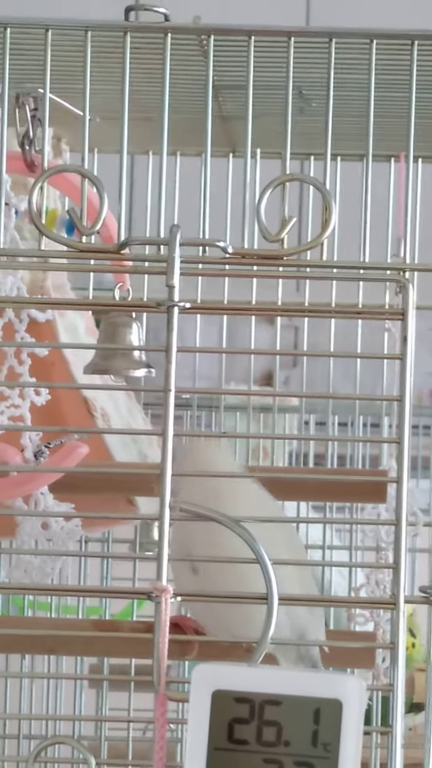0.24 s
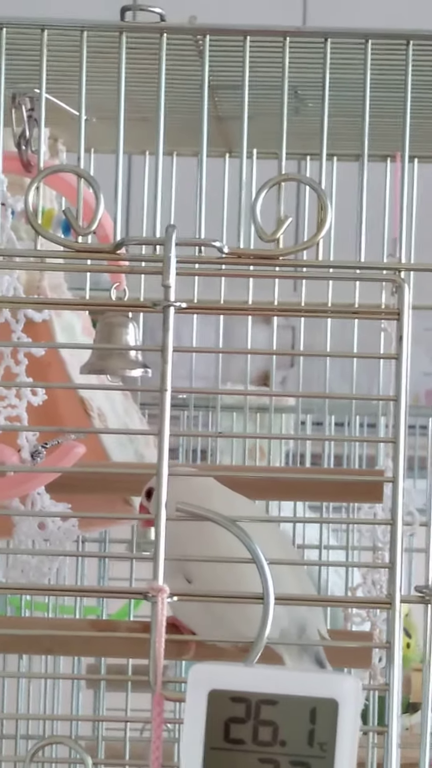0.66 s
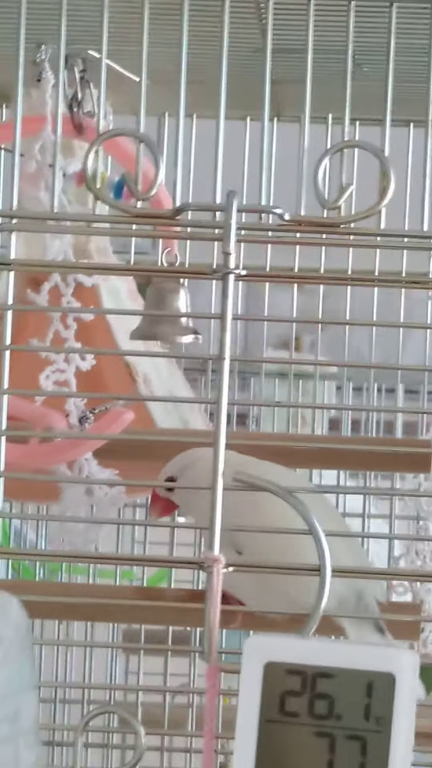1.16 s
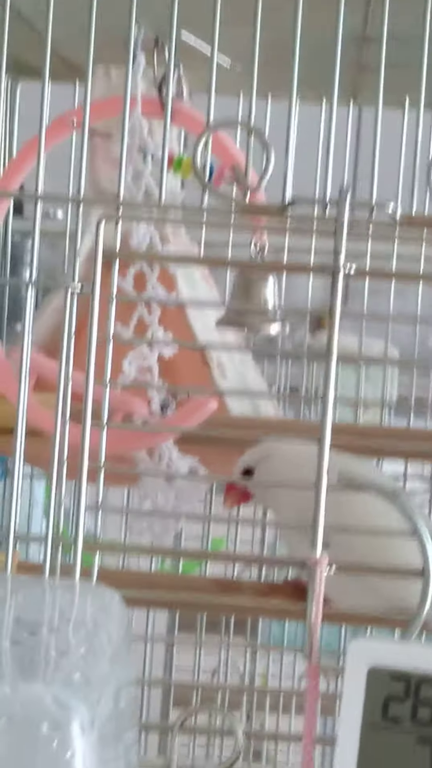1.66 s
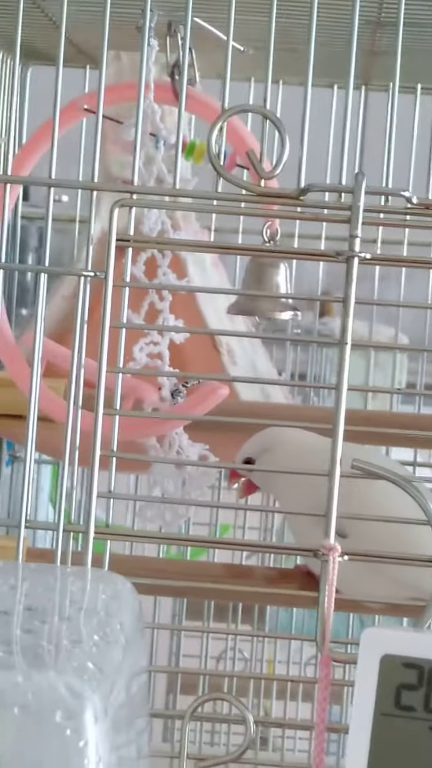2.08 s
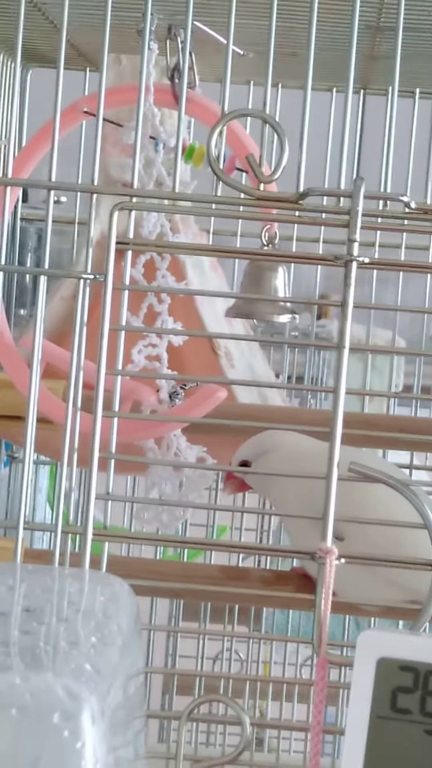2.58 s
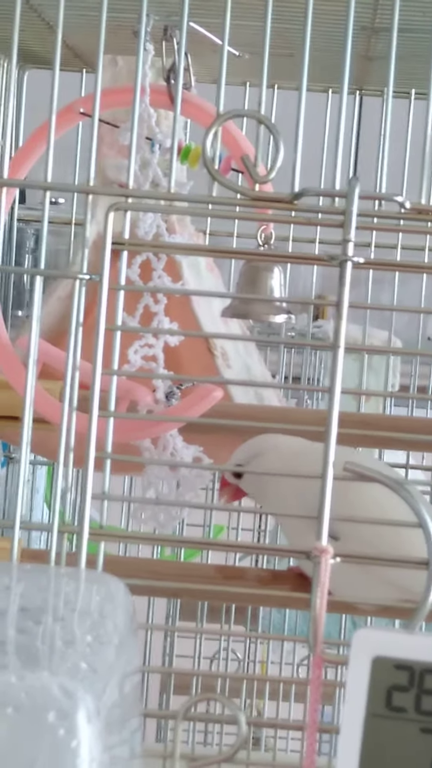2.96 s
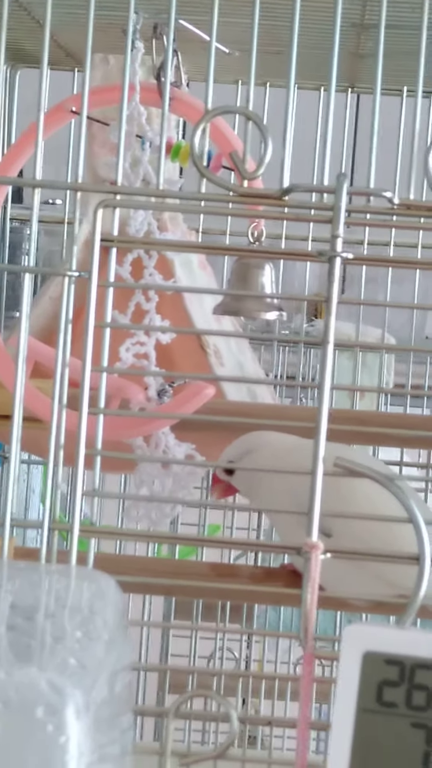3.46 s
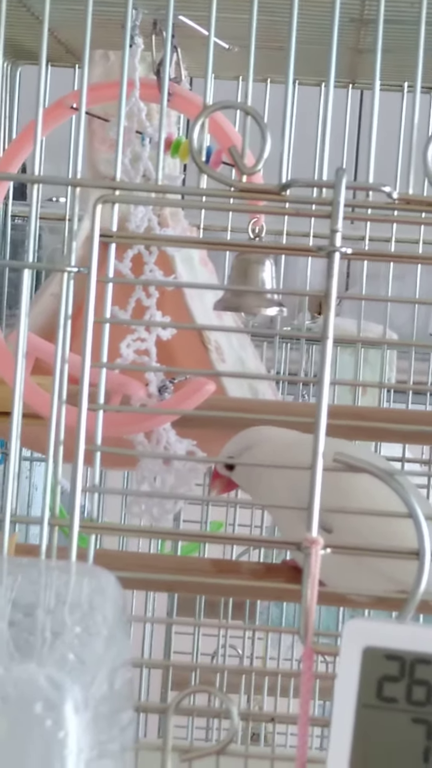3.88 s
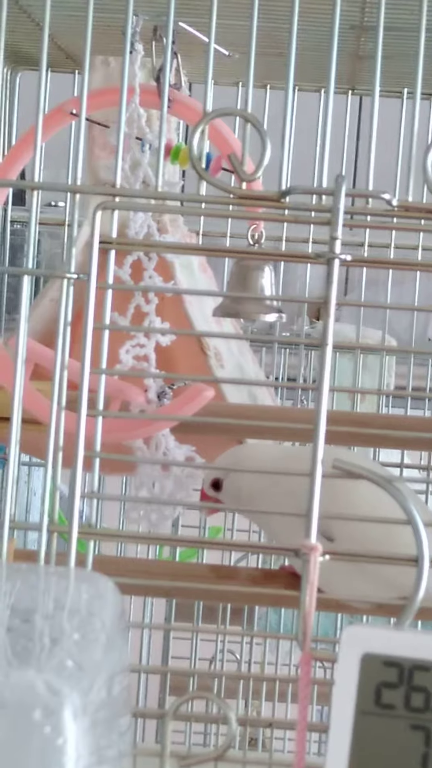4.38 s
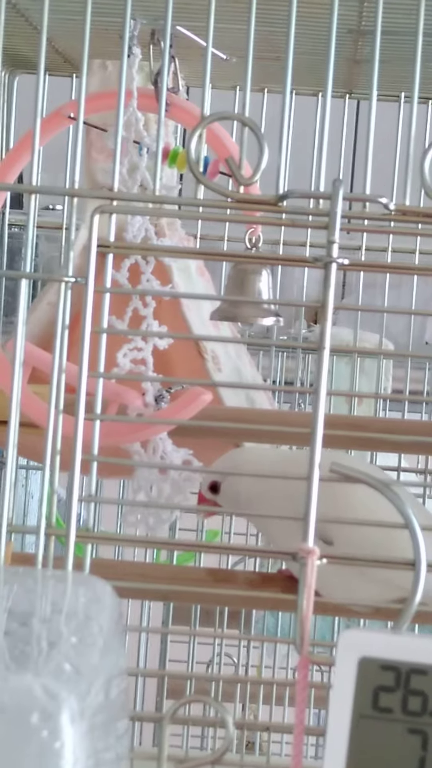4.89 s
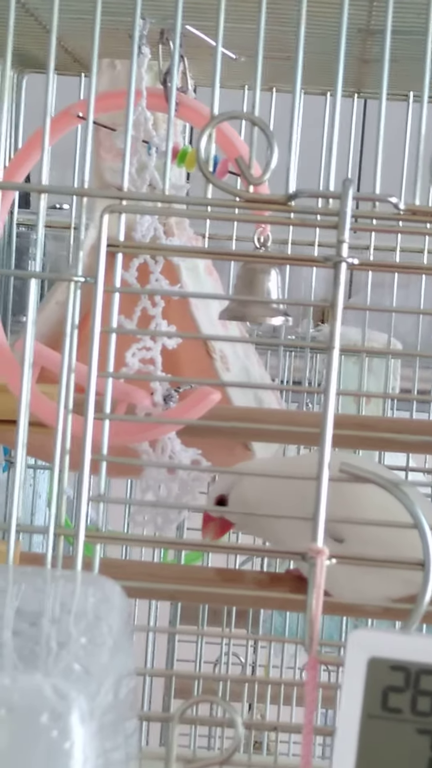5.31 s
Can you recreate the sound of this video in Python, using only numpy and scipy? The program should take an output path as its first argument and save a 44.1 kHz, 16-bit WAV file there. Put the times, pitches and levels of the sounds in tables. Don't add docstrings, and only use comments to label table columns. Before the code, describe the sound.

Indoors, a pet finch sings chips, a buzzy trill and sliding whistles on the right, while a gripping hand thumps and scrapes dully on the left.

```python
import sys
import numpy as np
from scipy import signal
from scipy.fft import rfft, irfft
from scipy.io import wavfile
from scipy.ndimage import uniform_filter1d

SR = 44100
rng = np.random.default_rng(int(sys.argv[2]) if len(sys.argv) > 2 else 0)


def inscribe(sig):
    pcm = np.round(np.clip(np.atleast_2d(sig).T, -1, 1) * 32767)
    wavfile.write(sys.argv[1], SR, pcm.astype(np.int16))


def makeup_ratio(level_db):
    decades = np.asarray(level_db, float) / 20
    return 10 ** decades


N = 244314
LEAD = 2048


def finch():
    song = np.zeros(N + LEAD)
    chips(song)
    trill(song)
    motifs(song)
    falling_whistles(song)
    far_bird(song)
    return makeup_ratio(1.5) * song


def syllable(song, shape, onset, db, pitch, overtones_db, warble=(0, 0, 0, 0), wobble=.004):
    s, share, level_db = np.transpose(shape)
    t = np.arange(s[0], s[-1], 1 / SR)
    chance = rng.standard_normal(15000)
    flutter = uniform_filter1d(chance, size=60)[:len(t)] * np.sqrt(60)
    drift = 0.13 * uniform_filter1d(chance, size=400)[:len(t)] * np.sqrt(400)
    start, rate, swing, swing_db = warble
    turns = np.cumsum((t > start) * rate * (1 + drift)) / SR
    dip = np.cos(2 * np.pi * turns) * np.minimum(turns, 1)
    glide = uniform_filter1d(np.interp(t, s, share), size=40, mode="nearest")
    shrinking_swing = swing * dip * (1 - 0.26 * t / s[-1])
    hz = pitch * glide * (1 + wobble * flutter + shrinking_swing)
    phase = 2 * np.pi * np.cumsum(hz) / SR
    tone = sum(makeup_ratio(g) * np.sin((k + 1) * phase) for k, g in enumerate(overtones_db))
    breath = makeup_ratio(db + np.interp(t, s, level_db) - swing_db * dip)
    place = int((onset + s[0]) * SR) + LEAD + np.arange(len(t))
    inside = place < len(song)
    song[place[inside]] += (breath * tone)[inside]


# (time [s], share of pitch [1], level [dB])
CHIP_SHAPE = [(-.002, 0.69, -19.5), (.0005, 0.82, -0.5), (.003, 0.95, -3.5), (.006, 0.97, -7.5),
              (.010, 1, 0), (0.012, 0.8, -57)]
RISE_SHAPE = [(-.001, 0.76, -35), (0, 0.83, -2), (.002, .97, -2.5), (.005, 1.02, -3), (.008, 0.996, -21)]
CHIP_OVERTONES = [-17.5, 0.5, -22.5, -21]
SOFT_CHIP_OVERTONES = [-11, -3.5, -32]
# (time [s], peak level [dB], second partial [Hz])
EARLIER_CHIP = [
    (-.015, -30.5, 2450),
]
LOUD_CHIPS = [(.4165, -30, 2527), (0.6272, -34.5, 2484), (.875, -33.5, 2350), (1.079, -29.5, 2567),
              (1.281, -34.5, 2414), (1.369, -33, 2452), (1.4513, -32, 2340), (1.532, -32.5, 2239),
              (1.613, -30.5, 2501), (1.697, -32, 2406), (1.778, -35.5, 2130)]
SOFT_CHIPS = [
    (0.2269, -44.5, 1743),
    (0.5398, -42.5, 1801),
    (0.7888, -42.5, 1806),
    (1.1796, -43, 1788),
]


def chips(song):
    for s, db, second_hz in EARLIER_CHIP + LOUD_CHIPS:
        syllable(song, CHIP_SHAPE, s, db, second_hz / 2, CHIP_OVERTONES)
    for s, db, second_hz in SOFT_CHIPS:
        syllable(song, RISE_SHAPE, s, db, second_hz / 2, SOFT_CHIP_OVERTONES)


# (time [s], sweep widths from the pitch [1], level [dB])
TRILL_SHAPE = [(-.008, -1.455, -65), (-.003, -0.82, -7), (.001, -0.17, -4.5), (.003, 0.2, 0),
               (.006, .9, -10.5), (0.01, 0.78, -45)]
# (time [s], share of pitch [1])
TRILL_SWEEP = [(1.87, 0.1), (1.93, 0.19), (2.15, 0.093), (2.3, 0.067), (2.6, 0.069)]
# (time [s], first partial level [dB], pitch [Hz], brightness [dB per partial])
TRILL_NOTES = [(1.8689, -30.5, 1469, -8), (1.8985, -27, 1600, -2), (1.933, -28, 1697, 0.9),
               (1.9638, -31, 1682, 0), (2.0, -31.5, 1652, 0.5), (2.034, -29.5, 1627, 0.35),
               (2.0677, -29.5, 1565, -1.4), (2.105, -31, 1533, 0.35), (2.142, -29.5, 1573, 0.75),
               (2.1796, -35.5, 1486, 1.5), (2.2162, -32, 1500, 0.9), (2.2527, -34.5, 1485, 0.7),
               (2.2903, -34.5, 1477, -0.1), (2.3301, -32.5, 1492, -0.2), (2.3667, -33, 1466, -0.4),
               (2.4022, -31.5, 1517, -1.5), (2.442, -30, 1495, -1.2), (2.4842, -32, 1441, -0.4),
               (2.5225, -32.5, 1449, -1.1), (2.5755, -38, 1333, -14)]
# (frequency [Hz], gain [dB])
THROAT = [(1500, -1), (2950, -1.1), (3350, 7), (4600, -7.5), (5900, 0.2), (6700, -12), (7500, -10.5),
          (9500, -32)]
# (time [s], share of pitch [1], level [dB])
DEEP_PIP_SHAPE = [(-.004, 0.805, -33), (.001, 0.924, -1), (.006, 0.988, -7), (.012, 1.02, 2),
                  (.018, 1.074, -27.5)]
# (time [s], peak level [dB], pitch [Hz])
DEEP_PIPS = [
    (1.8275, -44.5, 1135),
    (2.6493, -56, 1005),
    (2.699, -39, 1111),
]


def trill(song):
    throat_hz, throat_db = np.transpose(THROAT)
    k = np.arange(6)
    for s, db, hz, bright_db in TRILL_NOTES:
        sweep = np.interp(s, *np.transpose(TRILL_SWEEP))
        shape = [(after, 1 + sweep * step, level_db) for after, step, level_db in TRILL_SHAPE]
        resonance_db = np.interp(np.log(hz * (k + 1)), np.log(throat_hz), throat_db)
        syllable(song, shape, s, db, hz, bright_db * k + resonance_db, wobble=0.013)
    for s, db, pitch in DEEP_PIPS:
        syllable(song, DEEP_PIP_SHAPE, s, db, pitch, [0, -14])


# (time [s], share of pitch [1], level [dB])
TICK_SHAPE = [(-.0006, 0.75, -85), (0, 0.97, 0), (.0015, 0.98, 1), (.006, 1.0, -11), (.011, 0.5, -59)]
SQUEAK_SHAPE = [(-.002, 0.937, -62), (.001, 1.0, -2.5), (.007, 1.0, -27), (.011, 1.083, -7.5),
                (.014, 1.22, -8.5), (.017, 2.13, -28)]
HUM_SHAPE = [(-.004, .99, -39), (.006, .995, 7), (.03, 1.005, -15), (.05, 1.0, -3), (.06, 0.958, -1)]
LOW_PIP_OVERTONES = [-0.5, -17.5]
HUM_OVERTONES = [-2.5, -13.5]
# (time [s], tick level [dB], tick [Hz], squeak [Hz], low pip [Hz])
MOTIFS = [
    (2.787, -32.5, 6320, 2740, 1920),
    (3.2217, -36.5, 6170, 2765, 1926),
    (3.6736, -35, 6020, 2653, 1966),
    (4.143, -33.5, 6020, 2690, 1907),
    (4.591, -32.5, 6030, 2820, 1830),
    (5.0627, -31.5, 6005, 2890, 2020),
    (5.5308, -30, 5900, 2870, 1950),
]


def motifs(song):
    for s, db, tick_hz, squeak_hz, low_hz in MOTIFS:
        syllable(song, TICK_SHAPE, s, db, tick_hz, [0])
        syllable(song, SQUEAK_SHAPE, s + 0.0113, -41, squeak_hz, [0])
        syllable(song, RISE_SHAPE, s + 0.0215, -38, low_hz, LOW_PIP_OVERTONES)
        syllable(song, HUM_SHAPE, s + 0.095, -56.5, 880, HUM_OVERTONES)


# (time [s], pitch [Hz], level [dB])
HOOK = [(-.009, 6660, -42), (-.004, 6364, 0.5), (.001, 6020, 0.5), (.004, 7205, 1), (.009, 4868, 2.5),
        (.012, 4253, -11.5), (.016, 5010, -1.5), (.0205, 3784, -4)]


def fall_shape():
    end_s, release_s = 0.207, 0.043
    rest_hz, span_hz = 1213, 2858
    t = np.linspace(HOOK[-1][0], end_s + release_s, num=120)[1:]
    hz = rest_hz + span_hz * np.exp(-(t / 0.082) ** 1.35)
    fade_db = -33 * (1 - np.exp(-t / 0.087))
    crack_db = -17 * np.exp(-((t - 0.0764) / 0.0069) ** 2)
    release_db = -60 * np.maximum(t - end_s, 0) / release_s
    return np.vstack([HOOK, np.transpose([t, hz, fade_db + crack_db + release_db])])


FALL_OVERTONES = [-2.5, -36.5]
# (start [s], rate [Hz], pitch swing [share], level swing [dB])
WARBLE = (0.01593, 150, 0.039, 7.5)
# (time [s], peak level [dB], pitch factor [1], length factor [1])
FALLS = [
    (2.9575, -25, 1.0, 0.9),
    (3.3926, -25, 0.98, 0.89),
    (3.847, -25, 0.96, 0.91),
    (4.3131, -24, 0.99, 0.92),
    (4.7668, -24.5, 0.96, 0.91),
    (5.238, -23, 0.96, 0.93),
]


def falling_whistles(song):
    for s, db, pitch, length in FALLS:
        syllable(song, fall_shape() * [length, 1, 1], s, db, pitch, FALL_OVERTONES, WARBLE)


# (time [s], peak level [dB], pitch [Hz])
FAR_HUMS = [
    (4.2, -53.5, 1420),
    (4.245, -53.5, 1507),
    (4.3247, -60, 1264),
    (4.5057, -57, 1405),
    (4.6452, -57, 1333),
    (4.837, -56.5, 1256),
    (5.0298, -55, 1490),
    (5.1139, -55, 1300),
    (5.2432, -53.5, 1253),
    (5.493, -55, 1000),
]


def far_bird(song):
    for s, db, pitch in FAR_HUMS:
        syllable(song, HUM_SHAPE, s, db, pitch, HUM_OVERTONES)


def split_bands(x):
    low = signal.sosfilt(signal.butter(2, 4125, fs=SR, output="sos"), x)
    return low, x - low


# (time [s], level [dB])
FACING = [(0, 4), (1.2, 5), (1.85, 5.5), (2.0, 8), (2.3, 3), (2.601, 5), (2.899, 5.5), (3.9, 0.5),
          (4.701, 0.5), (5.54, -1)]


def room(dry):
    low, treble = split_bands(dry)
    direct = (low + makeup_ratio(-1.5) * treble)[LEAD:]
    facing = makeup_ratio(np.interp(np.arange(N) / SR, *np.transpose(FACING)))
    turn = np.pad(walk(5.032), (LEAD, 0), "edge")
    return facing * direct + reflections(dry * np.cos(turn)) + reflections(dry * np.sin(turn))


# (delay [s], level [dB])
ECHOES = [
    (.0042, -8.5),
    (.0075, -1),
    (.0118, -13),
    (0.0139, -6),
    (0.02, -25),
]


def reflections(dry):
    t = np.arange(SR // 2) / SR
    grains = rng.standard_normal(len(t)) * makeup_ratio(1.56 * rng.exponential(size=len(t)))
    low, treble = split_bands(grains)
    t60_low_s, t60_high_s = 0.4, 0.38
    tail = low * 1000 ** (-t / t60_low_s) + treble * 1000 ** (-t / t60_high_s)
    tail *= 1 - np.exp(-(t / 0.0052) ** 2)
    response = makeup_ratio(4.5) * tail / np.sqrt(np.sum(tail ** 2))
    for delay, db in ECHOES:
        response[int(delay * SR * rng.uniform(.94, 1.06))] += makeup_ratio(db)
    return signal.fftconvolve(dry, response)[LEAD:LEAD + N]


# (time [s], peak level [dB], ring frequency [Hz])
THUMPS = [
    (1.196, -14, 35),
    (1.278, -29.5, 44),
    (1.34, -22.5, 41.2),
    (1.445, -24, 35.5),
    (1.671, -25, 28.2),
    (1.69, -15.5, 38.1),
]


def thumps():
    out, t = np.zeros(N), np.arange(SR // 4) / SR
    t60_s = 0.35
    for s, db, hz in THUMPS:
        ring = -np.sin(2 * np.pi * hz * t) * 1000 ** (-t / t60_s)
        out[int(s * SR):int(s * SR) + len(t)] += makeup_ratio(db + 4.5) * ring
    return out


# (time [s], scrape level [dB], held [s])
GRIP = [
    (1.132, -49, 0.0029),
    (1.195, -36, 0.094),
    (1.36, -35, 0.019),
    (1.45, -36.5, 0.19),
    (1.669, -41, 0.11),
]


def grip_level():
    t = np.arange(N) / SR
    level = np.zeros(N)
    for s, db, held in GRIP:
        attack_db = 900 * np.maximum(s - t, 0)
        sag_db = 10 * np.clip(t - s, 0, held)
        release_db = 230 * np.maximum(t - s - held, 0)
        level += makeup_ratio(db - attack_db - sag_db - release_db)
    return level


# (time [s], level [dB])
HAND = [(0, -37.5), (.3, -45.5), (.57, -41), (1.1, -41.5), (1.7, -41.5), (2.0, -37), (2.6, -43),
        (2.85, -38.5), (3.4, -43), (4.1, -42), (4.6, -46), (5.54, -45.5)]
# (frequency [Hz], power density [dB])
RUMBLE_LEFT = [(8, 8), (15, 4), (30, 1.5), (45, 7), (70, -46), (100, -69)]
RUMBLE_RIGHT = [(8, 4), (30, -0.5), (44, -21.5), (56, -5.5), (72, -11.5), (100, -62)]
SCRAPE_COLOUR = [(40, -17), (65, 4), (100, -2), (200, -15.5), (350, -26), (500, -36.5), (800, -71)]


def handling():
    hand_db = np.interp(np.arange(N) / SR, *np.transpose(HAND))
    left, right = (makeup_ratio(hand_db + db + 2.5 * unit(walk(8.2))) for db in (3.5, 2.5))
    grip = grip_level()
    scrape = 2 * grip * makeup_ratio(4.3 * walk(60.4)) * unit(noise(SCRAPE_COLOUR))
    shaken = (left + 2 * makeup_ratio(7) * grip) * unit(noise(RUMBLE_LEFT))
    return np.array([shaken + scrape, right * unit(noise(RUMBLE_RIGHT))])


# (frequency [Hz], power density [dB])
AIR_RIGHT = [(50, -101), (75, -82.5), (100, -65.5), (130, -73.5), (200, -77), (300, -84), (450, -84.5),
             (1000, -89), (2000, -94.5), (4000, -95.5), (9000, -96.5), (15000, -95.5)]


def room_air():
    return noise(AIR_RIGHT) * makeup_ratio(walk(3.16))


# (frequency [Hz], power density [dB])
HISS_LEFT = [(40, -68), (70, -93), (100, -80.5), (150, -87.5), (300, -91.5), (1000, -99), (4000, -99),
             (16000, -99)]


def port_hiss():
    return noise(HISS_LEFT)


def noise(colour):
    hz, db = np.transpose(colour)
    bins = np.maximum(np.fft.rfftfreq(N, 1 / SR), 1)
    gain = makeup_ratio(np.interp(np.log(bins), np.log(hz), db)) * np.sqrt(SR / 2)
    return irfft(rfft(rng.standard_normal(N)) * gain, N)


def unit(x):
    return x / np.sqrt(np.mean(x ** 2))


def walk(rate):
    k = int(SR / rate)
    held = np.repeat(rng.standard_normal(N // k + 1), k)
    return uniform_filter1d(uniform_filter1d(held, k), k)[:N]


def scene():
    bird = room(finch())
    left = makeup_ratio(-46) * bird + port_hiss() + thumps()
    right = bird + room_air()
    return np.array([left, right]) + handling()


def roll_off(x):
    return signal.sosfilt(signal.butter(12, 16780, fs=SR, output="sos"), x)


# (centre [Hz], width [Hz], share removed [1])
PORT_DIP = (4560, 760, 0.18)


def record(dry):
    hz = np.fft.rfftfreq(N, 1 / SR)
    centre, width, share = PORT_DIP
    dip = 1 - share * np.exp(-((hz - centre) / width) ** 2)
    mix = irfft(rfft(dry) * dip * (hz < 15950), N)
    return roll_off(mix)


dry = scene()
out = record(dry)
inscribe(out)
```